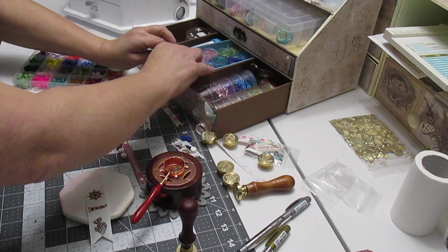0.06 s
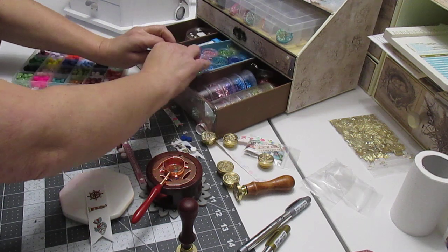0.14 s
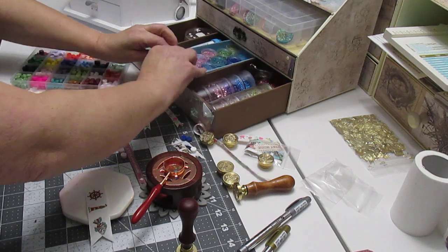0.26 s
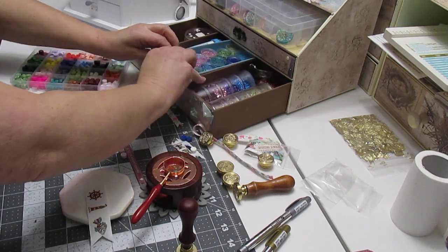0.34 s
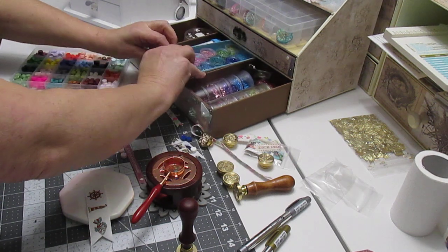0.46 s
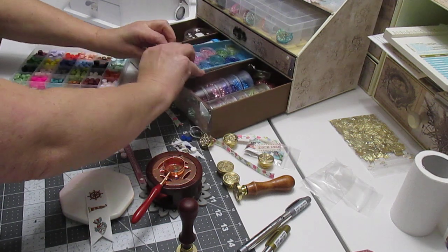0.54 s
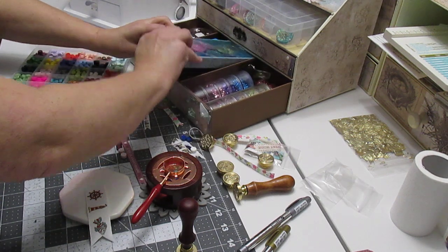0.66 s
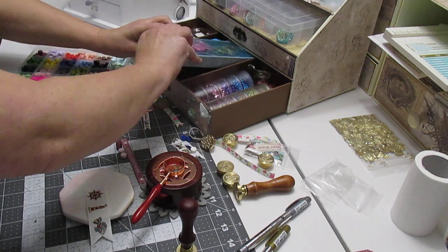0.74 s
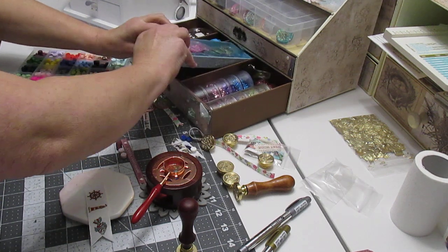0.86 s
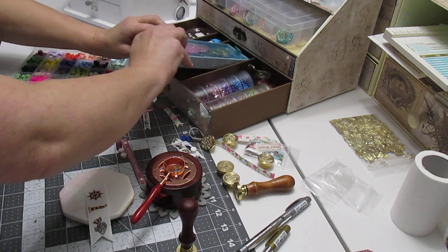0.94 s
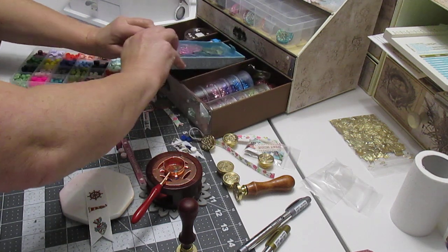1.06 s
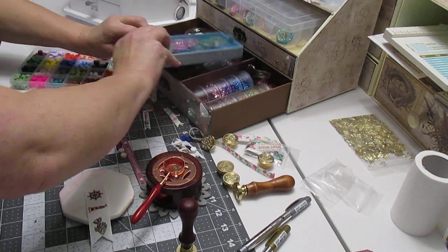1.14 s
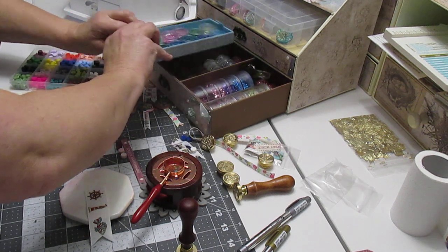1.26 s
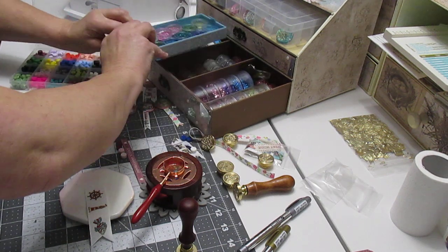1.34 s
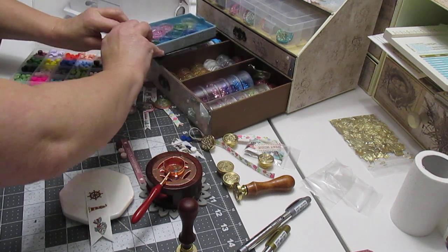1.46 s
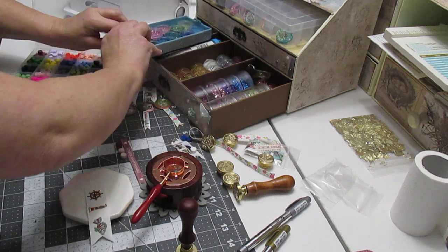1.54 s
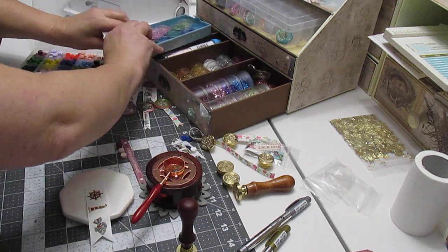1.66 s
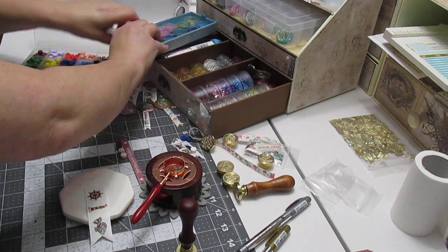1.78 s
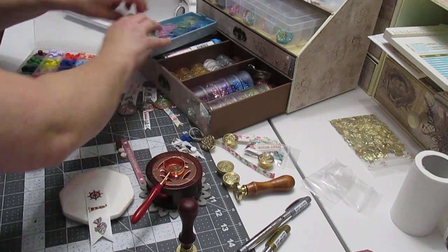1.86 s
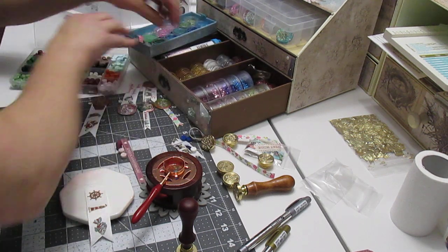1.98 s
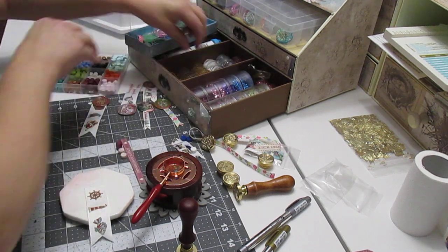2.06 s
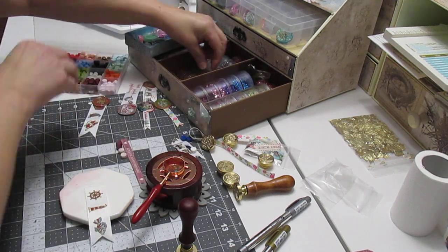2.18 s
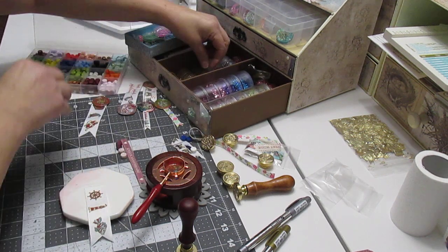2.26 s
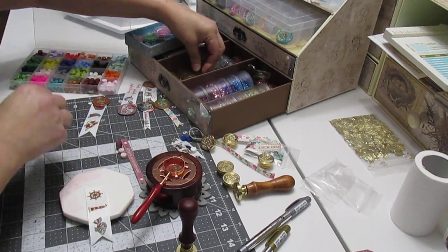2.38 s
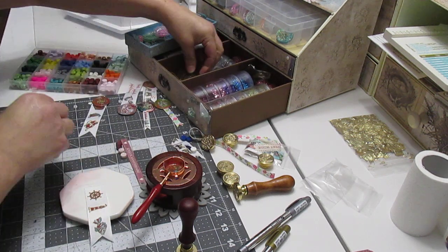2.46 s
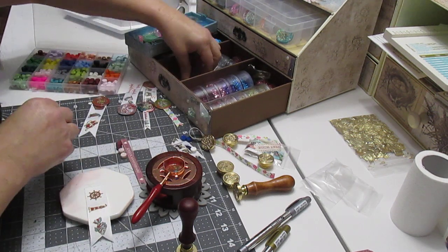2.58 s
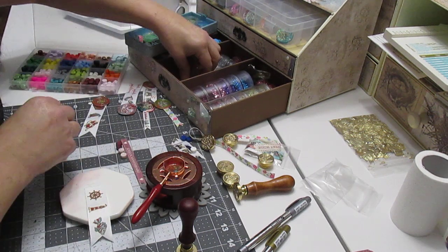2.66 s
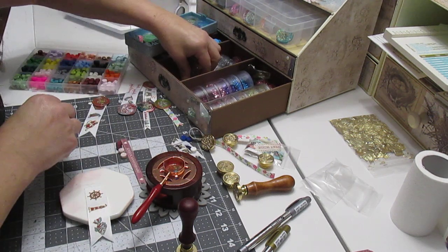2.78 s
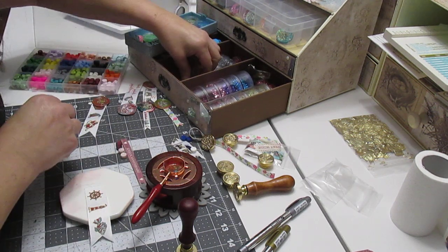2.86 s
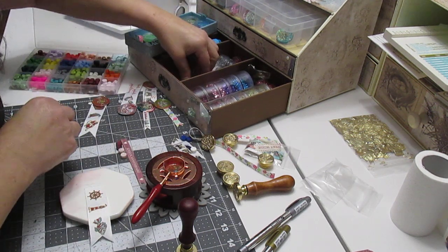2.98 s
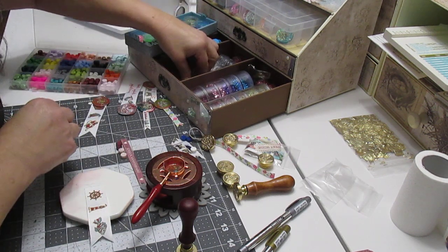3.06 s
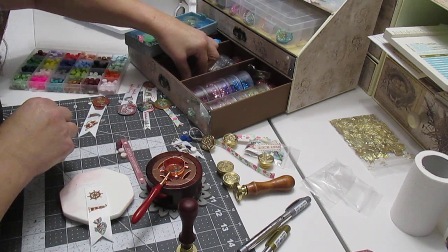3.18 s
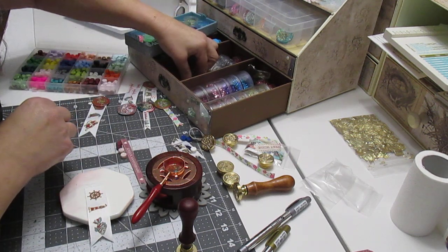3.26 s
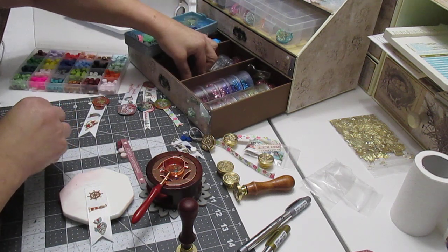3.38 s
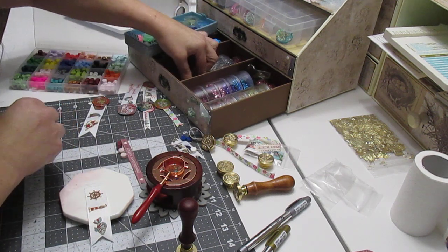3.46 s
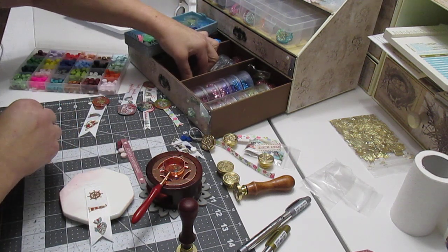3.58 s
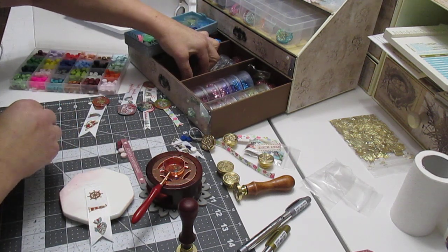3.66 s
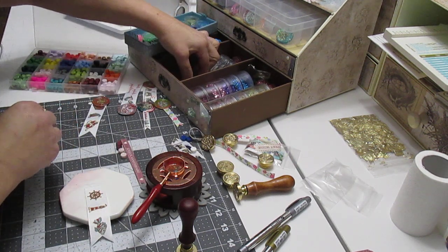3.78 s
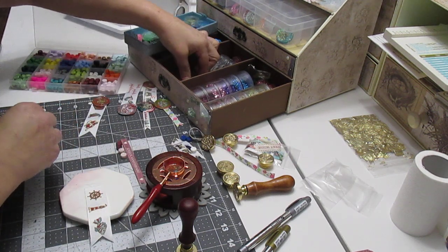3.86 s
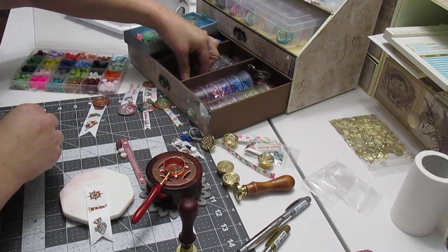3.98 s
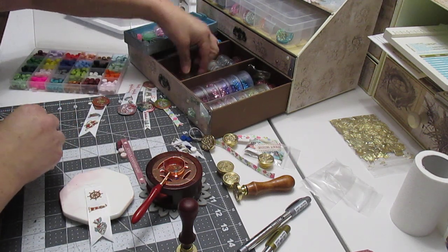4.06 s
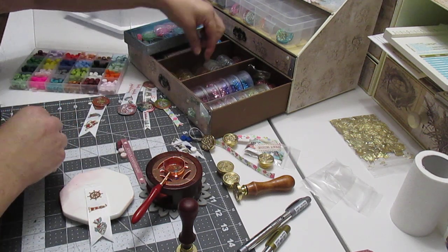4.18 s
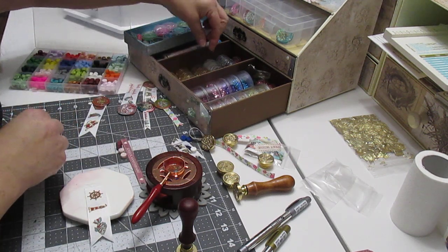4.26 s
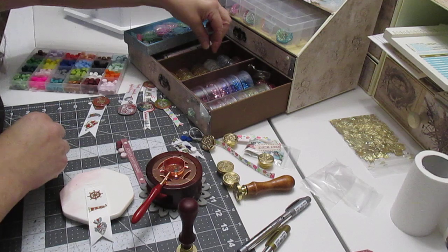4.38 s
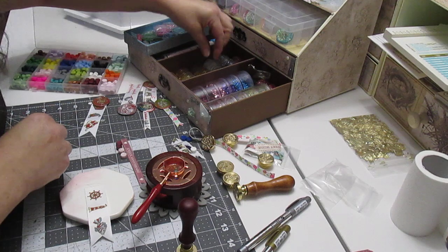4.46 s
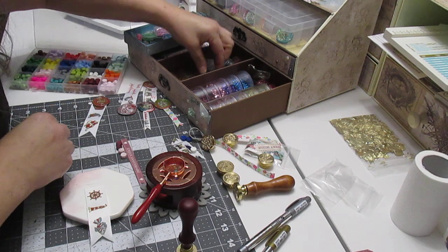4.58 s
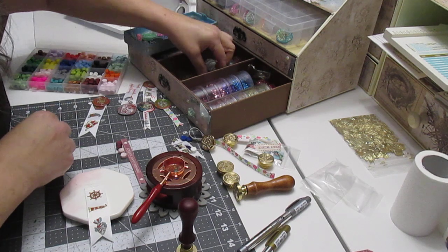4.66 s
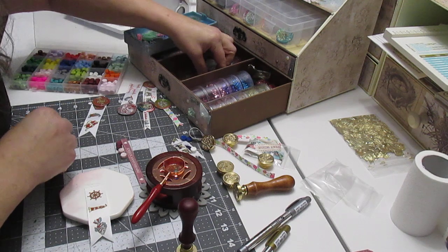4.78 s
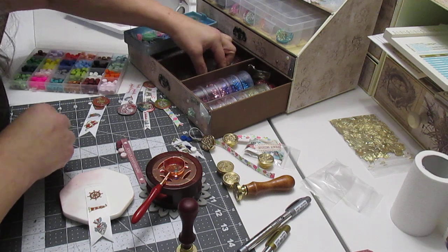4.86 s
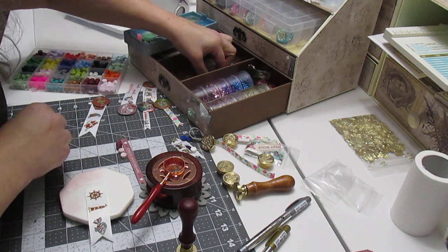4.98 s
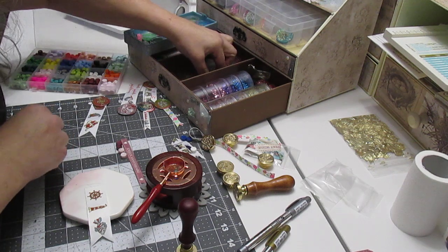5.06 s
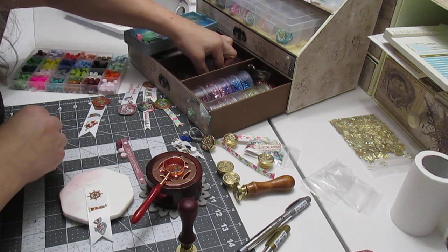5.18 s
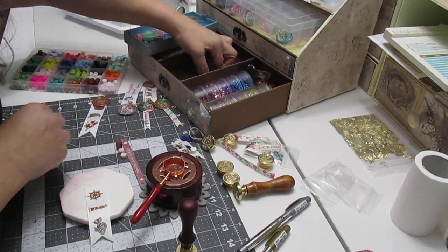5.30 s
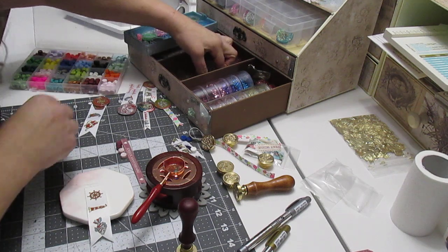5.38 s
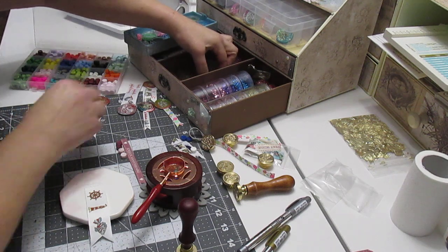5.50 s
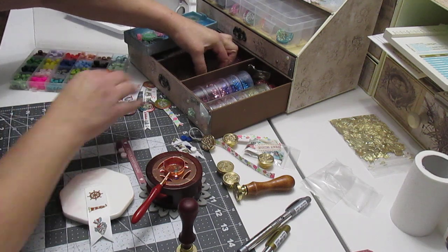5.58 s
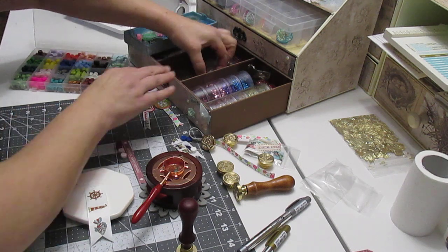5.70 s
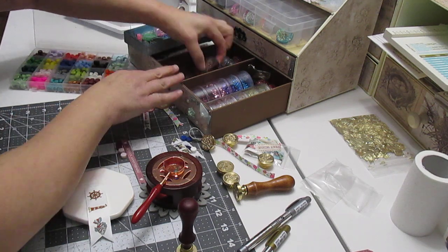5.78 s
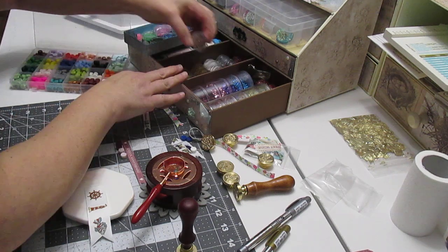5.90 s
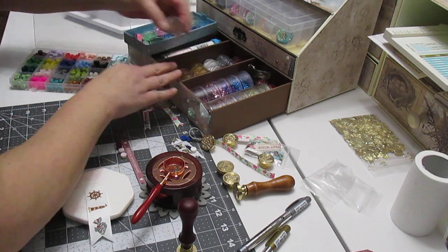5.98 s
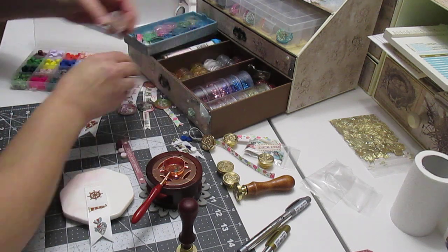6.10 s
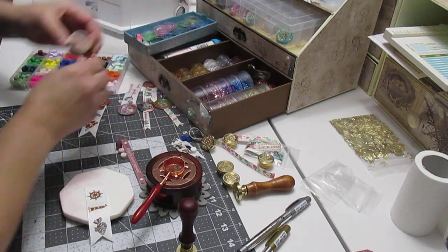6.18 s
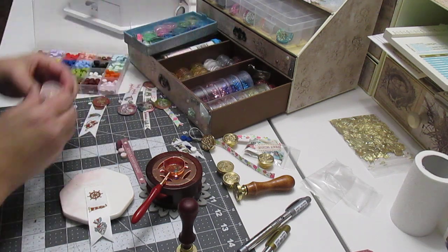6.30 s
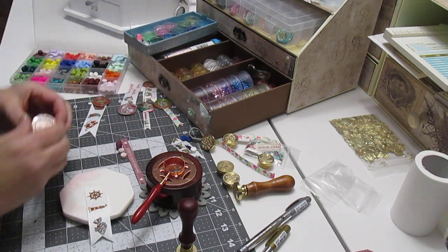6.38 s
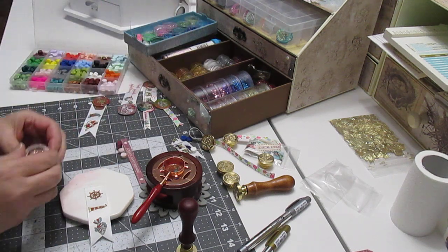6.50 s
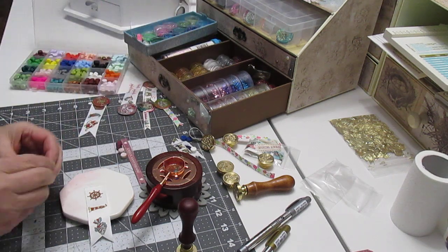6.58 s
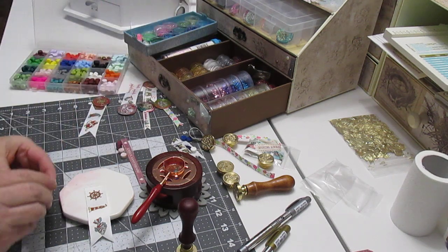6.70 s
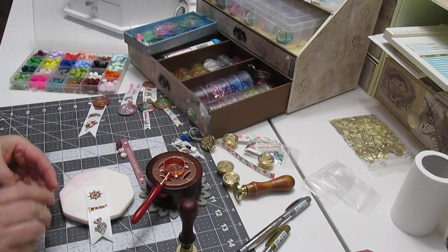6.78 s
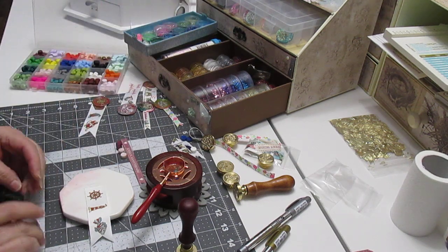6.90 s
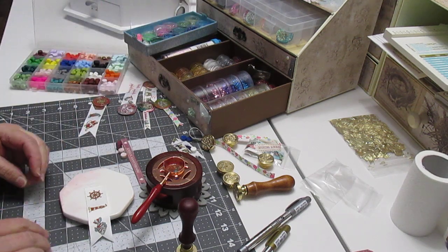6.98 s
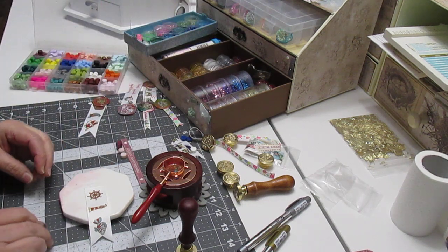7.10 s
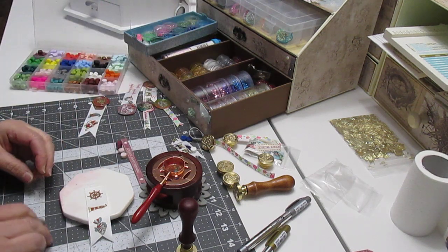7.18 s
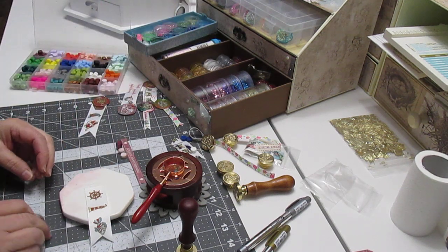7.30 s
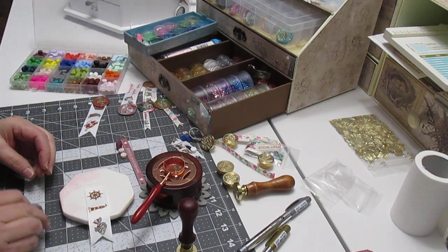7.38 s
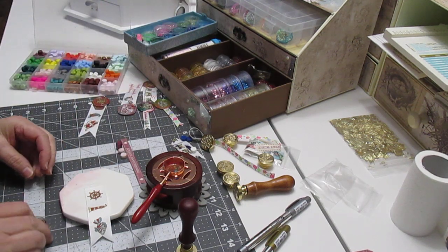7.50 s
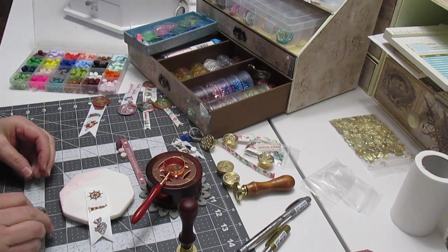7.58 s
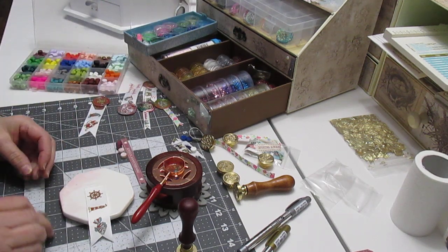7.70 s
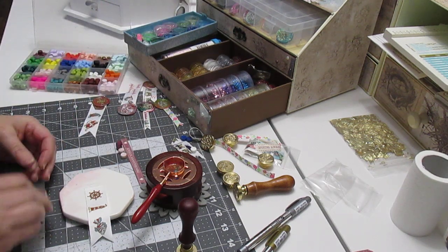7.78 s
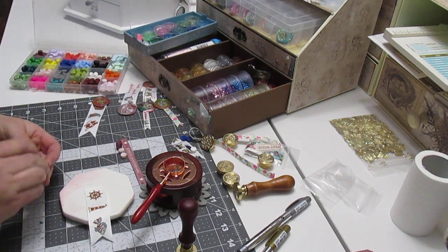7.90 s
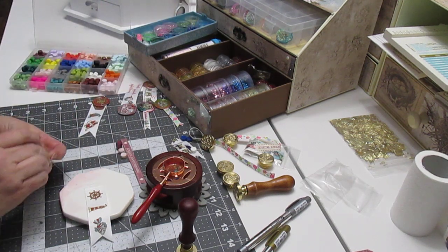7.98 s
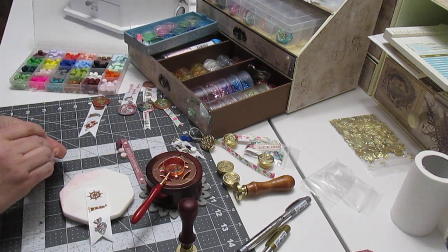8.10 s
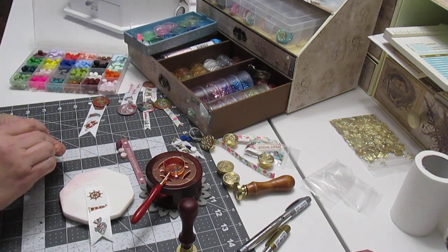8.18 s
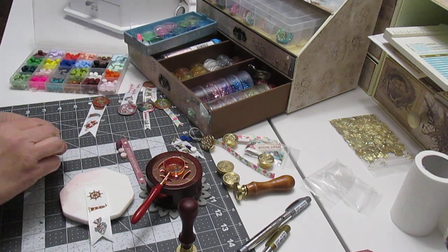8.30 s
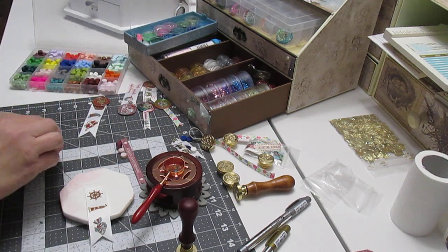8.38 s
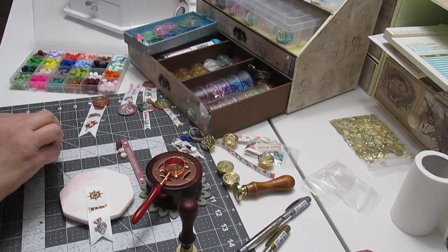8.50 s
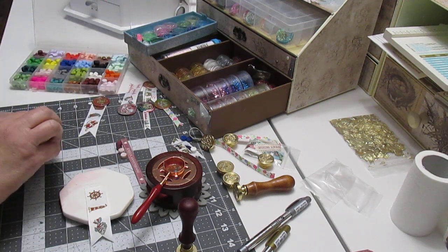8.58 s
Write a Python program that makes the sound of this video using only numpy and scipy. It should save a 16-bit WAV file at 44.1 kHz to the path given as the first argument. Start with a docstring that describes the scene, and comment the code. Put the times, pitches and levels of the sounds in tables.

```python
"""Pots in a cardboard drawer

Close stereo microphones at a desk in a small furnished room with a faint hum. Hands bump a tray out of a
cardboard drawer and rummage among small plastic pots; then one pot is rapped five times, bright on the left.
Each contact is a strike plus a noise spray driving resonators; friction is coloured noise in slips and catches.
Diffuse reflections and steady air noise lie behind."""
import sys
import numpy as np
from scipy import signal
from scipy.fft import rfft, irfft, next_fast_len
from scipy.io import wavfile
from scipy.ndimage import uniform_filter1d

SR = 44100
rng = np.random.default_rng(int(sys.argv[2]) if len(sys.argv) > 2 else 0)


def to_wav(sig):
    """Store sig (one row per channel, or 1-D mono) as 16-bit WAV at the path in sys.argv[1].

    Samples outside -1..1 are clipped; the rate is SR.
    """
    pcm = np.clip(np.atleast_2d(sig), -1, 1) * 32767
    pcm = np.round(pcm).astype(np.int16)
    wavfile.write(sys.argv[1], SR, pcm.T)  # frames by channels


N = 381465  # samples

# length of the soft noise onset before each strike (s)
ONSET_S = 0.01
# how far modes shift from blow to blow (share of pitch): in the drawer, and under the changing grip
DRAWER_DETUNE, GRIP_DETUNE = 0.014, 0.06

# what rings in a knock, nominally; one list per part: drawer thump, drawer floor, pot hollow, pot wall, rim tick
# columns: f/Hz, width/Hz, level/dB within the part
KNOCK_MODES = [
    [(241, 56, -1.5), (303, 57, -0.5), (445, 78, 0)],
    [(502, 114, -0.5), (548, 105, 7.5), (613, 305, 2.5), (756, 106, -0.5)],
    [(879, 43, -1.5), (987, 81, 2), (1162, 290, 3), (1338, 52, 6), (1556, 430, -2)],
    [(2085, 38, -0.5), (2564, 1650, -4), (3005, 1300, -3.5), (3630, 504, -5), (4400, 340, -30.5)],
    [(5040, 4300, -8.5), (7630, 780, 1.5), (8560, 550, -0.5), (10320, 1500, 5), (11030, 3000, 3.5),
     (14200, 2100, -9)],
]


def rummaging(wall_width_hz=500, wall_db=4.5, desk_db=-15):
    """Pots knock in the drawer, mostly to the right; each adds its own wall pitch, the desk answers below."""
    out = np.zeros((3, N))
    floor, hollow, wall, rim = KNOCK_MODES[1:]
    desk = energy_one(resonate(signal.unit_impulse(SR // 8), hz=72, width=60))
    desk = desk * np.sqrt(SR / 100)  # unit rms over 10 ms
    # spray over strike for each part: most in thump and hollow, least in the rim tick
    scuff_parts_db = np.array([2.5, -1.5, 3.0, -0.5, -3.5])
    for s, panels, levels_db, scuff_db, wall_hz in blows():
        pot_wall = sorted(wall + [(wall_hz, wall_width_hz, wall_db)])
        parts = [panels, floor, hollow, pot_wall, rim]
        # the more spray, the slower its onset
        onset_t60 = 0.011 * np.clip(from_db(scuff_db), 0.2, 3)
        knock = contact(levels_db, parts, scuff_db + scuff_parts_db, spray_t60=0.069, onset_t60=onset_t60,
                        alike=0.64, detune=DRAWER_DETUNE, uneven_db=4.0, grain_db=4.5,
                        left_db=[0.5, -1.0, -1.5, -3.0, 6.0], room_db=[-3.5, 1.5, -0.1, -4.0, 0.0])
        add(out, knock, s - ONSET_S)
        add(out, from_db(levels_db[0] + desk_db) * desk[None], s)
    return from_db(0.23) * out


def blows():
    """Every contact: s, thumping panels, dB of thump, floor, hollow, wall and rim, scuff dB, wall pitch Hz."""
    yield from tray_bumps()
    yield from clacks()
    yield from drops()
    yield from nail_ticks()
    yield from jostles()


# the tray's thump, nominally; columns: f/Hz, width/Hz, level/dB within the thump
TRAY_MODES = [(193, 42, -8.5), (237, 54, -2), (309, 53, 2.5), (386, 84, -8)]
# the tray bumps its way out of the drawer; levels are before the overall gain of the rummaging
# columns: t/s, thump level/dB, hollow level/dB, wall level/dB, rim tick level/dB, scuff over strike/dB
TRAY_BUMPS = [(0.008, -45, -31, -39.5, -51, 1), (0.066, -63, -52, -48, -32.5, 4),
              (0.08, -69, -57, -38.5, -67, 7), (0.119, -55, -37, -37, -42.5, 4),
              (0.254, -48, -46.5, -59, -55, 26), (0.492, -41.5, -34, -57, -69, 5.5),
              (0.604, -46, -36.5, -30.5, -28.5, 16), (0.663, -55, -41, -36, -41, 3),
              (0.675, -31, -27.5, -37, -49, 28), (0.717, -59, -32.5, -27.5, -32.5, 15),
              (0.758, -70, -36.5, -42, -55, -8), (0.82, -67, -38.5, -39, -66, -2),
              (0.834, -50, -38, -27.5, -35, -1.5), (0.879, -70, -40, -38, -62, -5),
              (0.934, -61, -29.5, -29.5, -61, 0.5), (0.942, -68, -36.5, -25.5, -35, 5),
              (1.132, -69, -46.5, -35, -48, 3), (1.185, -73, -53.5, -48, -56, -10),
              (1.62, -33.5, -31.5, -34, -43, 3), (1.757, -45, -40, -51, -51, 5),
              (1.801, -47, -41, -42, -43.5, 16), (1.85, -50, -43, -56, -63, -7),
              (1.862, -65, -62, -38, -40, 2)]


def tray_bumps(even_wall_hz=2947, hardness_hz_per_db=25.5, floor_db=-7):
    """A bump rings the tray's wall higher the harder the edge (rim over wall); the floor follows the hollow."""
    for s, thump, hollow, wall, rim, scuff in TRAY_BUMPS:
        wall_hz = even_wall_hz + hardness_hz_per_db * (rim - wall)
        yield s, TRAY_MODES, [thump, hollow + floor_db, hollow, wall, rim], scuff, wall_hz


# pot clacks against pot; levels are before the overall gain of the rummaging
# columns: t/s, hollow level/dB, wall level/dB, rim tick level/dB, scuff over strike/dB, wall f/Hz
CLACKS = [(2.593, -52, -48.5, -52, 0, 3730), (2.614, -49, -40, -54, 22, 3530),
          (2.639, -32.5, -31.5, -41.5, -1.5, 3430), (2.657, -36, -42, -45, 10, 2730),
          (2.74, -57, -48, -55.5, -3, 3550), (2.947, -43.5, -47.5, -60, -3, 3600),
          (3.014, -51, -48, -63, 4, 2750), (3.032, -51, -46, -53.5, 17, 3300),
          (3.07, -53, -32.5, -42, -10, 3200), (3.079, -37, -38.5, -45, 6, 2090),
          (3.094, -38, -36.5, -47, -5, 2500), (3.195, -54, -45, -49, -11, 3140),
          (3.216, -48, -40, -31.5, 2, 2980), (3.246, -48, -43.5, -36, 1, 2330),
          (3.264, -44, -44, -44, 6, 2160), (3.299, -47, -50, -55, 0, 2220), (3.466, -51, -46, -49, 3, 4100),
          (3.486, -44.5, -35, -39, -2, 3430), (3.527, -40.5, -37, -46.5, 0, 2600),
          (3.573, -32, -26, -39.5, -11, 3160), (3.728, -41.5, -45, -64, 1, 2940),
          (3.907, -42, -43.5, -44, 3, 3520), (4.003, -45.5, -47, -67, -5, 2320),
          (4.028, -44, -33, -46, -4, 3340), (4.162, -34.5, -34, -40, -1, 2780),
          (4.181, -38.5, -30.5, -35.5, 2, 3400), (4.692, -39.5, -46.5, -54, 9, 2190),
          (4.738, -52, -52, -46.5, 5, 2120), (4.766, -37, -26.5, -36.5, -1.5, 2490),
          (4.779, -29.5, -28, -46, -4.5, 2570), (4.808, -33, -27.5, -32, -2, 3820),
          (4.943, -39, -35, -41, 2, 3340), (4.954, -39, -34, -43, 7, 3320),
          (4.964, -34, -52, -41.5, 4, 2110), (5.073, -40.5, -46, -64, -9, 3270),
          (5.084, -38.5, -38, -54.5, 4, 2510), (5.219, -27, -19.5, -32.5, -4, 2440),
          (5.431, -44.5, -48, -64, 1, 2110), (5.475, -38, -46.5, -42, 10, 2094),
          (5.657, -55, -37.5, -46, -7, 3650), (5.794, -51, -54.5, -67, -1, 3150),
          (6.091, -51, -59, -73, 1, 3160)]


def clacks(thump_db=-14.5, floor_db=-10.5):
    """A share of each clack's hollow ring reaches the drawer's panels and its floor."""
    for s, hollow, wall, rim, scuff, wall_hz in CLACKS:
        levels_db = [hollow + thump_db, hollow + floor_db, hollow, wall, rim]
        yield s, KNOCK_MODES[0], levels_db, scuff, wall_hz


# a pot drops on the drawer floor; levels are before the overall gain of the rummaging
# columns: t/s, floor level/dB, hollow level/dB, wall level/dB, rim tick level/dB, scuff over strike/dB
DROPS = [(2.629, -36, -37, -38.5, -49, 1), (3.569, -30.5, -29, -34, -49, -1.5),
         (3.858, -48, -49, -57, -64, -1), (4.075, -21, -21.5, -28, -42.5, 5),
         (4.112, -35, -41, -44, -53, 1), (4.137, -28.5, -26.5, -32.5, -39, -0.5),
         (5.576, -27.5, -35, -39.5, -47, 7), (5.593, -39, -46, -41, -42.5, 18)]


def drops(thump_db=-12, wall_hz=2110):
    """The panels follow the struck floor; a flat landing rings the pot's wall at a low pitch."""
    for s, floor, hollow, wall, rim, scuff in DROPS:
        yield s, KNOCK_MODES[0], [floor + thump_db, floor, hollow, wall, rim], scuff, wall_hz


# a fingernail ticks on the rim of the pot in the hand; columns: t/s, level/dB before balance and overall gain
NAIL_TICKS = [(6.599, -52), (8.541, -56), (8.572, -52), (8.586, -54)]
# balance of a tick: thump, floor, hollow, wall, rim; column: level/dB
NAIL_PARTS_DB = np.array([-25.0, -22.0, -18.0, -14.0, -0.5])


def nail_ticks(scuff_db=-1, wall_hz=3600):
    """A light hard tap sounds mostly as rim tick, with little wall and hollow."""
    for s, level_db in NAIL_TICKS:
        yield s, KNOCK_MODES[0], level_db + NAIL_PARTS_DB, scuff_db, wall_hz


# balance of a jostle: thump, floor, hollow, wall, rim; column: level/dB
JOSTLE_PARTS_DB = np.array([-8.0, -9.0, -5.5, -8.0, -19.0])


def jostles(per_s=9.0, over_scrape_db=-10.5, spread_db=6, wall_range_hz=(2100, 3820)):
    """Neighbours knock faintly at random moments of each push, stronger when the push is harder."""
    for start, length, scrape_db, _ in PUSHES:
        # four candidates per push, each kept by chance
        for when, chance, size, pitch in rng.random((4, 4)):
            if chance < per_s * length / 4:
                level_db = scrape_db + over_scrape_db + spread_db * (2 * size - 1)
                wall_hz = np.interp(pitch, [0, 1], wall_range_hz)
                yield start + when * length, KNOCK_MODES[0], level_db + JOSTLE_PARTS_DB, 0, wall_hz


# raps of the hand-held pot, close by; levels are before the overall gain of the rapping
# columns: t/s, desk thud level/dB, pot body level/dB, rim snap level/dB, scatter over strike/dB
RAPS = [(7.014, -38, -26.5, -27, 4), (7.1745, -42.5, -28, -30, -1.5), (7.3545, -37.5, -25, -22, 10),
        (7.534, -41, -30, -24.5, -2), (7.697, -43, -28, -23, -1)]
# what rings in a rap, nominally; one list per part: desk thud, pot body, rim snap
# columns: f/Hz, width/Hz, level/dB within the part
RAP_MODES = [
    [(76.6, 44, 3.5), (226, 41, 0), (360, 72, 0.5), (550, 49, 0), (850, 290, 1.5)],
    [(1315, 140, -1), (1970, 1000, -1.5), (2580, 640, 0.5), (4040, 2400, -5.5)],
    [(6000, 1340, 2), (8370, 550, 11), (8800, 1300, 0), (11700, 1100, 2.5), (13600, 2600, -7)],
]


def rapping(crack_db=-6.5):
    """The hand-held pot is rapped smartly, bright at the left microphone.

    A dense scatter of close reflections follows each rap."""
    out = np.zeros((3, N))
    # the very first instant of hard contact: barely two cycles
    crack = resonate(signal.unit_impulse(SR // 100), hz=8800, width=3200)
    crack = energy_one(crack * from_db([[3.5], [-3.5]])) * np.sqrt(SR / 100)
    scatter_parts_db = np.array([5, 5, 2.5])
    for s, *levels_db, scatter_db in RAPS:
        rap = contact(levels_db, RAP_MODES, scatter_db + scatter_parts_db, spray_t60=0.065, onset_t60=0.0041,
                      alike=0.39, detune=GRIP_DETUNE, uneven_db=0.75, grain_db=5.5,
                      left_db=[0.8, -0.4, 4.0], room_db=[0.2, 0.5, -0.3])
        add(out, rap, s - ONSET_S)
        add(out[:2], from_db(levels_db[2] + crack_db) * crack, s)
    # the sound reaches the right side four samples later
    out[1] = np.roll(out[1], 4)
    return from_db(0.9) * out


def contact(levels_db, parts, sprays_db, spray_t60, onset_t60, alike, detune, uneven_db, grain_db, left_db, room_db):
    """A strike and a grainy noise spray ring each part; levels are rms over 10 ms.

    sprays_db, left_db and room_db hold one value per part. Rows: left, right and what goes out into the room."""
    size, lead = SR // 8, int(ONSET_S * SR)
    strike = signal.unit_impulse(size, lead)
    # soft onset: noise swells briefly up to the strike, then decays
    swell = np.concatenate([fade(lead, onset_t60)[::-1], fade(size - lead, spray_t60)])
    # each grain lasts eight samples
    grain_levels = np.repeat(rng.standard_normal(size // 8 + 1), 8)[:size]
    grains = from_db(grain_db * grain_levels)
    spray = energy_one(stereo_noise(size, alike) * grains * swell)
    out = 0
    for level_db, modes, spray_db, pan_db, send_db in zip(levels_db, parts, sprays_db, left_db, room_db):
        force = np.vstack([strike + from_db(spray_db) * spray, strike])
        ring = 0
        for k, (hz, width, db) in enumerate(modes):
            # every pot is a little different, and every point of contact favours other modes
            favour, shift = rng.standard_normal(2)
            mode = resonate(force, hz * (1 + detune * shift), width)
            ring = ring + (-1) ** k * from_db(db + uneven_db * favour) * mode
        edges = [modes[0][0] * 0.8, min(modes[-1][0] * 1.2, SR * 0.45)]
        ring = band_pass(ring, edges)
        near = energy_one(ring[:2] * from_db([[pan_db / 2], [-pan_db / 2]]))
        sent = from_db(send_db) * energy_one(ring[2])
        out = out + from_db(level_db) * np.vstack([near, sent])
    return out * np.sqrt(SR / 100)


# shoves of the tray over the drawer; columns: t/s, length/s, scrape level/dB, hiss level/dB
SLIDES = [(0.0, 0.087, -43.5, -53), (0.31, 0.048, -47, -45.5), (0.41, 0.47, -49.5, -57),
          (0.64, .11, -45, -39), (0.79, 0.23, -46.5, -49), (1.1, 0.089, -55, -53.5),
          (1.635, 0.24, -54.5, -45), (1.785, 0.062, -43, -44)]
# fingers push the pots about; levels are before the gain given to rubbing()
# columns: t/s, length/s, scrape level/dB, hiss level/dB
PUSHES = [(2.576, 0.23, -50.5, -57), (2.977, 0.13, -48.5, -70), (3.224, 0.087, -51, -55.5),
          (3.415, 0.17, -43.5, -50.5), (3.772, 0.27, -49.5, -69), (4.147, 0.098, -43, -55),
          (4.826, .2, -46.5, -55.5), (5.263, 0.12, -69, -54.5), (5.47, 0.27, -48, -57)]
# colour of the card scrape; columns: f/Hz, relative density level/dB
SCRAPE = [(120, -10), (260, -7), (550, -0.5), (1000, 1), (1700, 1), (3200, -5.5), (5000, -17.5),
          (7500, -32)]
# colour of the hiss of skin and plastic; columns: f/Hz, relative density level/dB
HISS = [(2000, -6), (3500, 5), (5000, -1), (6500, -1), (9000, -2), (12000, 1), (14000, -9), (16000, -23)]


def rubbing(strokes, gain_db, rough_db, catch_db):
    """Friction: a grainy scrape of card and a fine hiss of skin and plastic, in quick slips and slower catches."""
    scrape, hiss = np.zeros((2, N))
    for s, length, scrape_db, hiss_db in strokes:
        effort = stroke(s, length)
        scrape = np.maximum(scrape, from_db(scrape_db) * effort)
        hiss = np.maximum(hiss, from_db(hiss_db) * effort)
    quick = rough_db * wander(50)
    slow = catch_db * wander(500)
    slips = from_db(quick + slow)
    card = scrape * coloured(stereo_noise(N, 0.83) * slips, SCRAPE)
    skin = hiss * coloured(stereo_noise(N, 0.31) * slips, HISS)
    return from_db(gain_db) * (card + skin)


# skin brushes over the pot in the hand; columns: t/s, length/s, level/dB
BRUSHES = [(5.878, 0.092, -54), (6.277, 0.42, -63.5), (8.3, 0.059, -75.5), (8.48, .16, -69.5)]
# colour of the brushing; columns: f/Hz, relative density level/dB
BRUSH = [(400, 1.5), (1200, 2), (2800, 4.5), (3800, -2), (4800, -3), (8000, -5.5), (12000, -4),
         (16000, -23)]


def brushing():
    """The pot is lifted out and turned between the fingers: soft noise that catches irregularly."""
    level = sum(from_db(db) * stroke(s, length) for s, length, db in BRUSHES)
    catches = from_db(3.5 * wander(400))
    return level * coloured(stereo_noise(N, 0.18) * catches, BRUSH)


def stroke(start, length, attack_s=0.16, release_s=0.22):
    """Gain of one hand movement: swells from -60 dB, holds, dies away to -60 dB in the given times."""
    t = np.arange(N) / SR - start
    before = np.maximum(-t, 0) / attack_s
    after = np.maximum(t - length, 0) / release_s
    return np.exp(-np.log(1000) * (before + after).clip(0, 10))


# decay of the room; columns: f/Hz, t60/s
ROOM_T60 = [(150, 0.25), (530, 0.42), (1400, 0.54), (3700, 0.45), (7000, 0.28), (13000, 0.32)]
# reverberation of the room, before the left-right tilt; columns: f/Hz, level/dB
ROOM_DB = [(100, -4.5), (500, -7.5), (1400, -3.5), (3000, -5.5), (6000, -7.5), (13000, -13.5)]
# left-right likeness of the reverberation; columns: f/Hz, likeness (0-1)
ROOM_LIKENESS = [(200, 0.71), (700, 0.88), (1500, 0.28), (3500, 0), (12000, 0)]


def room(x):
    """Diffuse reflections build up within milliseconds and die at a different rate in each band."""
    size = SR * 3 // 4
    edges = np.geomspace(70, 17000, 25)
    build_up = (1 - fade(size, 0.0063)) ** 2
    response = 0
    for low, high in zip(edges, edges[1:]):
        hz = np.sqrt(low * high)
        tail = stereo_noise(size, at_hz(ROOM_LIKENESS, hz)) * fade(size, at_hz(ROOM_T60, hz)) * build_up
        band = energy_one(band_pass(tail, [low, high]))
        response = response + from_db(at_hz(ROOM_DB, hz)) * band * np.sqrt(2 * (high - low) / SR)
    tilt = from_db([[-0.6], [0.6]])
    return tilt * signal.fftconvolve(x[None], response, axes=1)[:, :N]


# colour of the air noise; columns: f/Hz, relative density level/dB
AMBIENCE = [(18, -2), (28, 5), (38, -5), (55, -7), (85, -7.5), (120, -10.5), (150, -9.5), (270, -10),
            (530, -17.5), (1050, -17.5), (3200, -24), (7000, -26.5), (11800, -24.5), (16500, -36)]
# left-right likeness of the air noise; columns: f/Hz, likeness (0-1)
LIKENESS = [(30, 0.2), (60, 0), (130, 0), (300, 0), (1000, 0.14), (3000, 0), (12000, 0.05)]
# steady machine hum; columns: f/Hz, rms level/dB
HUM = [(29, -66), (120, -70)]


def ambience(air_db=-56.5):
    """Air noise and microphone hiss as one coloured noise, and a low hum of steady sines."""
    size = next_fast_len(N)
    alike = np.clip(at_hz(LIKENESS, np.arange(size // 2 + 1) * SR / size), -1, 1)
    mid, side = rfft(rng.standard_normal((2, size)))
    air = irfft(np.sqrt(1 + alike) * mid + np.sqrt(1 - alike) * side * np.array([[1], [-1]]), size)
    hum = 0
    for hz, db in HUM:
        cycles = hz * np.arange(N) / SR + rng.random()
        hum = hum + from_db(db) * np.sqrt(2) * np.sin(2 * np.pi * cycles)
    return from_db(air_db) * coloured(air, AMBIENCE) + hum


def from_db(db):
    """Amplitude factor of a level in dB."""
    return 10 ** (np.asarray(db) / 20)


def rms_one(x):
    """Unit rms over all channels."""
    return x / np.sqrt(np.mean(x ** 2) + 1e-20)


def energy_one(x):
    """Unit energy in the average channel."""
    return x / np.sqrt(np.mean(np.sum(x ** 2, axis=-1)) + 1e-20)


def at_hz(points, hz):
    """Read a curve of (Hz, value), straight over log frequency."""
    points = np.array(points)
    return np.interp(np.log(np.maximum(hz, 1)), np.log(points[:, 0]), points[:, 1])


def fade(size, t60):
    """Exponential decay by 60 dB in t60 seconds."""
    return np.exp(-np.log(1000) * np.arange(size) / (SR * t60))


def add(out, sound, s):
    """Mix a sound in at s seconds."""
    start = max(0, int(s * SR))
    out[:, start:start + sound.shape[1]] += sound[:, :N - start]


def wander(samples):
    """Smoothed random curve of unit rms."""
    return rms_one(uniform_filter1d(rng.standard_normal(N), size=samples))


def stereo_noise(size, alike):
    """White noise whose two channels are partly the same."""
    mid, side = rng.standard_normal((2, size))
    alike = np.clip(alike, -1, 1)
    return np.sqrt((1 + alike) / 2) * mid + np.sqrt((1 - alike) / 2) * side * np.array([[1], [-1]])


def coloured(x, spectrum):
    """Shape noise by a spectrum of (Hz, dB), to unit rms."""
    size = next_fast_len(N)
    hz = np.arange(size // 2 + 1) * SR / size
    shaped = rfft(x, size) * from_db(at_hz(spectrum, hz))
    return rms_one(irfft(shaped, size)[:, :N])


def band_pass(x, edges):
    """Keep what lies between two edges in Hz."""
    return signal.sosfilt(signal.butter(2, edges, "band", fs=SR, output="sos"), x)


def resonate(x, hz, width):
    """One damped mode: a two-pole resonator that rings longer the narrower it is."""
    r = np.exp(-np.pi * abs(width) / SR)
    zeros = np.array([1, 0, -1]) * (1 - r * r) / 2
    poles = [1, -2 * r * np.cos(2 * np.pi * hz / SR), r * r]
    return signal.lfilter(zeros, poles, x)


def scene():
    """Knocks, raps and friction at the desk, their reflections, and the air of the room."""
    knocks, raps = rummaging(), rapping()
    slides = rubbing(SLIDES, gain_db=0.0, rough_db=2.5, catch_db=3.0)
    pushes = rubbing(PUSHES, gain_db=-7.0, rough_db=3.5, catch_db=-5.5)
    friction = slides + pushes + brushing()
    # what each source sends out into the room
    radiated = from_db(0.2) * knocks[2] + from_db(-0.5) * raps[2] + friction.mean(axis=0)
    return knocks[:2] + raps[:2] + friction + room(radiated) + ambience()


def record(dry, cutoff_hz=16400):
    """Peaks beyond full scale are clipped; the top is cut steeply."""
    low_pass = signal.ellip(10, 0.2, 70, cutoff_hz, fs=SR, output="sos")
    return signal.sosfilt(low_pass, np.clip(dry, -1, 1))


dry = scene()
out = record(dry)
to_wav(out)
```